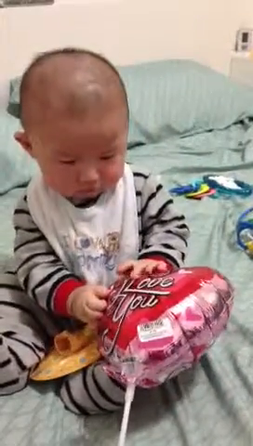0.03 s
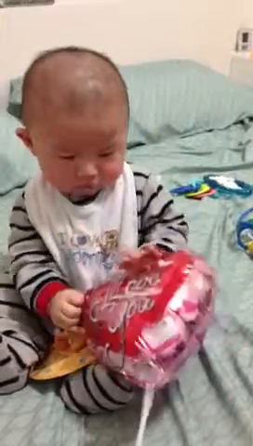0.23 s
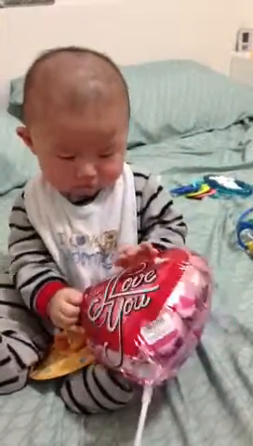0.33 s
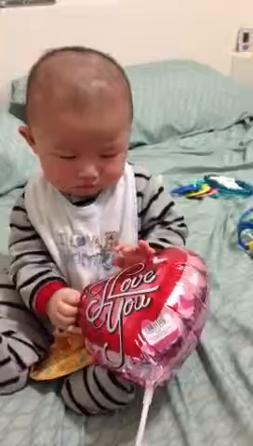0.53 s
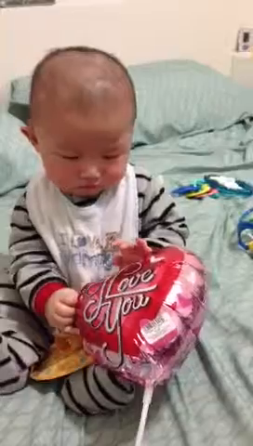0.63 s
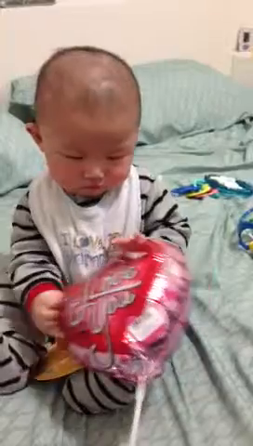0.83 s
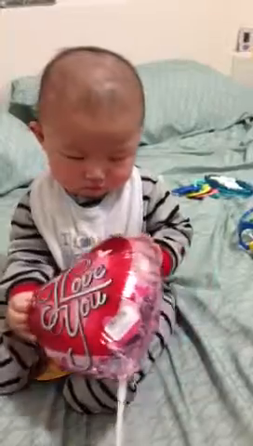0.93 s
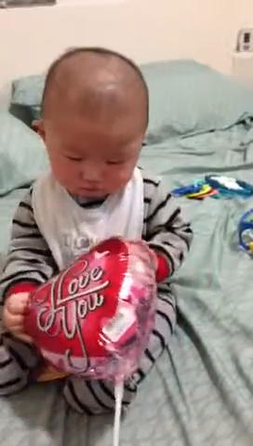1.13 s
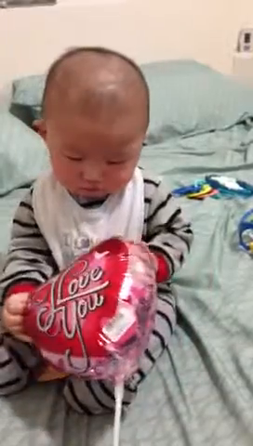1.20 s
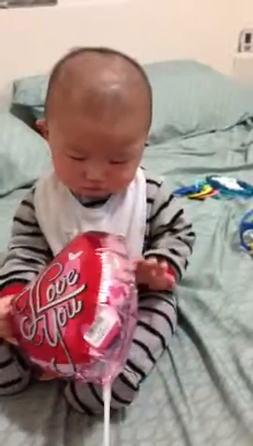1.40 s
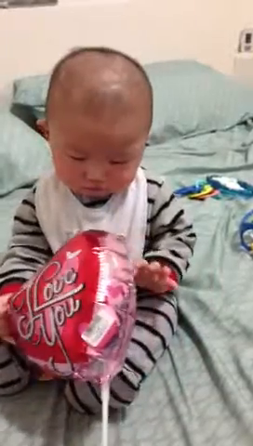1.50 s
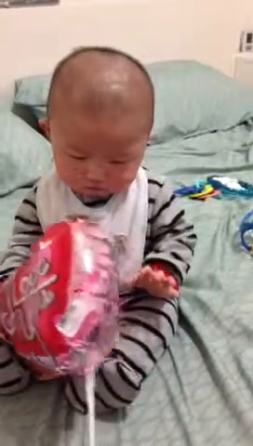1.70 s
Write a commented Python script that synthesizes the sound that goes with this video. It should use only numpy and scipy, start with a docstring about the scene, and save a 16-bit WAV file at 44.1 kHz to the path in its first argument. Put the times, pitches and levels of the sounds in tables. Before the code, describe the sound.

A foil balloon crinkles and thumps under light pats, with a brief finger squeak.

```python
"""A baby pats and turns an inflated foil balloon on a bed, close to the microphone.
Light taps build to a thump of the taut skin at 0.27 s, amid snapping creases and fine crinkling.
After a lull the foil crackles again from 0.75 s, and a finger squeaks across it in one broken stroke.
A sharp pat follows at 1.17 s, a softer one at 1.32 s, then a few last ticks.
Throughout, the gas inside rings faintly and a small bedroom answers, over a faint hiss."""
import sys
import numpy as np
from scipy import signal
from scipy.fft import rfft, irfft
from scipy.io import wavfile
from scipy.ndimage import uniform_filter1d

SR = 44100
rng = np.random.default_rng(int(sys.argv[2]) if len(sys.argv) > 2 else 0)


def transcribe(signal):
    """Save signal, clipped to [-1, 1], as a 16-bit WAV file at the path in sys.argv[1]."""
    frames = np.atleast_2d(signal).T
    limited = np.clip(frames, -1, 1)
    pcm = np.round(limited * 32767).astype(np.int16)
    wavfile.write(sys.argv[1], SR, pcm)


N = 77175


def undb(db):
    """Decibels to gain."""
    return 10 ** (np.asarray(db) / 20)


def unit(x):
    """Scale to energy 1."""
    return x / np.sqrt(np.sum(x ** 2) + 1e-20)


def unit_rms(x):
    """Scale to rms 1."""
    return unit(x) * np.sqrt(len(x))


def decay(t, t60_s):
    """Exponential fade, 60 dB down at t60_s."""
    return np.exp(-np.log(1000) * t / t60_s)


def band(x, lo_hz, hi_hz, order=2):
    """Causal band-pass."""
    sos = signal.butter(order, [lo_hz, min(hi_hz, .47 * SR)], "band", fs=SR, output="sos")
    return signal.sosfilt(sos, x)


def colour(x, curve):
    """Filter by a curve of f/Hz, gain/dB."""
    hz, db = np.array(curve).T
    bins_hz = np.maximum(np.arange(len(x) // 2 + 1) * SR / len(x), 1)
    gain = undb(np.interp(np.log(bins_hz), np.log(hz), db))
    return irfft(rfft(x) * gain, len(x))


# hiss spectrum: f/Hz, relative level/dB
HISS_SPECTRUM = [(30, -41), (90, -2.5), (170, 10.5), (400, 8.5), (1000, -1), (2000, -3.5), (3300, 4),
                 (6000, 1.5), (12000, 0), (15000, -4)]


def hiss(rms_db=-68):
    """Faint steady coloured noise."""
    return unit_rms(colour(rng.standard_normal(N), HISS_SPECTRUM)) * undb(rms_db)


# echo bands: low f/Hz, high f/Hz, gain/dB, t60/s
ROOM_BANDS = [(128.3, 472, -9.5, 0.13), (496, 1160, -8, 0.15), (956, 2000, -5.5, 0.2),
              (2037, 4600, -8.5, .25), (4350, 12000, -12.5, 0.1), (8100, 21000, -11, 0.14)]


def bedroom(x, delay_s=.0016, build_s=.0049, late_db=-24.5, late_t60_s=.65):
    """Short diffuse echo with a faint longer tail."""
    t = np.arange(SR * 3 // 4) / SR
    build = 1 - np.exp(-np.maximum(t - delay_s, 0) / build_s)
    echo = 0
    for lo_hz, hi_hz, db, t60_s in ROOM_BANDS:
        fade = decay(t, t60_s) + undb(late_db) * decay(t, late_t60_s)
        noise = band(rng.standard_normal(len(t)), lo_hz, hi_hz, order=3)
        band_share = 2 * (hi_hz - lo_hz) / SR
        echo += undb(db) * np.sqrt(band_share) * unit(noise * build * fade)
    return signal.fftconvolve(x, echo)[:N]


# skin and gas modes: f/Hz, impulse response level/dB, t60/s
CAVITY_MODES = [(741, -68, 0.2), (1230, -65.5, 0.2), (1363, -61.5, 0.27), (1566, -58.5, 0.25),
                (1748, -69, 0.35), (1850, -52.5, 0.11), (2530, -69.5, .16), (2580, -67.5, .16),
                (2870, -46.5, .016), (3760, -35, 0.0098)]


def cavity(x):
    """Skin and enclosed gas ring on in their modes."""
    t = np.arange(SR // 2) / SR
    ring = sum(undb(db) * decay(t, t60_s) * np.cos(2 * np.pi * hz * t) for hz, db, t60_s in CAVITY_MODES)
    return signal.fftconvolve(x, ring)[:N]


# crinkle envelope: t/s, rms level/dB
CRINKLE_ENVELOPE = [(0, -71), (.055, -65.5), (.12, -75.5), (.2, -52.5), (.255, -44.5), (.3, -36),
                    (.335, -49), (.39, -62), (.5, -66), (.71, -70.5), (.8, -50), (.9, -53), (.95, -45),
                    (1.005, -43), (1.04, -55), (1.14, -63), (1.38, -68.5), (1.48, -83.5)]
# foil tick spectrum: f/Hz, relative level/dB
FOIL_SPECTRUM = [(100, -4.5), (200, 8.5), (500, 6.5), (1100, -0.5), (1900, 4.5), (3000, 2.5), (5500, 4.5),
                 (9000, -7.5), (15000, -5.5)]


def crinkle(ticks_per_s=600, spread_db=3.8):
    """The hand works the foil: a shower of tiny, uneven ticks."""
    t = np.arange(N) / SR
    ticks = (rng.random(N) < ticks_per_s / SR) * rng.choice([-1, 1], N)
    sizes = undb(spread_db * np.minimum(rng.exponential(size=N), 4))
    envelope = undb(np.interp(t, *np.array(CRINKLE_ENVELOPE).T))
    return unit_rms(colour(ticks * sizes, FOIL_SPECTRUM)) * envelope


# chirps of one finger stroke: t/s, f/Hz, level/dB, rise/s, fall/s
SQUEAK_CHIRPS = [(0.8446, 1708, -41, .001, 0.0025), (.9170, 1700, -43.5, .001, 0.0052),
                 (0.964, 1925, -30, .0004, 0.0024), (0.9931, 707.8, -27.5, .003, 0.013)]
# harmonics 1-4: relative level/dB
SQUEAK_HARMONICS_DB = [0.5, -11.5, -17, -34]


def squeak(at_s, hz, level_db, rise_s, fall_s, jitter=.035):
    """A fingertip sticks and slips on the foil: one wavering chirp."""
    t = np.arange(N) / SR - at_s
    waver = unit_rms(uniform_filter1d(rng.standard_normal(N), size=120))
    phase = 2 * np.pi * np.cumsum(hz * (1 + jitter * waver)) / SR
    swell = 2 * np.exp(-np.logaddexp(-t / rise_s, t / fall_s))
    tone = sum(undb(db) * np.sin(k * phase) for k, db in enumerate(SQUEAK_HARMONICS_DB, 1))
    return undb(level_db) * swell * tone


def swing(t, settled_hz, rise_s, sweep):
    """A few cycles of the skin, peak near 1. Short waves cross it first, so the pitch falls."""
    glide_s = min(2 * rise_s, .0011)
    cycles = settled_hz * (t + sweep * glide_s * (1 - np.exp(-t / glide_s)))
    envelope = t / rise_s * np.exp(1 - t / rise_s)
    return -envelope * np.sin(2 * np.pi * cycles)


# crease snaps: t/s, then level/dB in the low, middle, high and top band
CREASE_SNAPS = [(0.0557, -57, -54, -63, -72), (0.0627, -73, -55, -51, -66), (0.0736, -67, -54, -51, -57),
                (0.1372, -52, -58, -65, -77), (0.1538, -77, -61, -58, -68), (0.1695, -43, -35, -44, -56),
                (0.2092, -39, -41, -40, -60), (0.22, -39, -38, -51, -60), (0.2336, -39, -34, -43, -53),
                (0.2474, -32, -31, -36, -42), (0.2592, -32, -28, -39, -50), (0.2637, -31, -39, -35, -49),
                (0.2725, -24, -23, -25, -38), (0.2863, -32, -33, -36, -42), (0.289, -37, -36, -42, -50),
                (0.2972, -41, -40, -42, -51), (0.3055, -46, -38, -41, -50), (0.3152, -43, -43, -44, -55),
                (0.3245, -50, -47, -46, -55), (0.3396, -44, -40, -43, -59), (0.345, -47, -38, -43, -48),
                (0.3574, -48, -45, -49, -59), (0.4363, -66, -53, -63, -71), (0.5518, -70, -63, -64, -70),
                (0.5667, -73, -58, -65, -69), (0.5777, -52, -46, -49, -60), (0.59, -71, -55, -68, -73),
                (0.7323, -64, -61, -62, -64), (0.7541, -38, -37, -40, -57), (0.8178, -46, -38, -43, -48),
                (0.8442, -66, -41, -44, -48), (0.8531, -57, -46, -42, -48), (0.8552, -65, -45, -43, -50),
                (0.8664, -60, -54, -57, -53), (0.8837, -48, -50, -63, -65), (0.9038, -59, -44, -52, -60),
                (0.9149, -48, -41, -47, -45), (0.9233, -62, -56, -52, -51), (0.9285, -61, -50, -50, -53),
                (0.9371, -51, -37, -38, -49), (0.9437, -57, -39, -42, -54), (0.9551, -48, -41, -41, -43),
                (0.9628, -37, -29, -45, -55), (0.9754, -49, -42, -39, -44), (0.978, -45, -45, -41, -50),
                (0.9834, -40, -33, -34, -38), (0.9986, -34, -43, -39, -43), (1.0276, -49, -54, -53, -60),
                (1.0647, -53, -53, -54, -60), (1.0792, -59, -48, -51, -54), (1.0946, -58, -52, -55, -63),
                (1.1694, -37, -43, -50, -53), (1.1732, -26, -27, -36, -40), (1.3198, -38, -44, -54, -62),
                (1.3802, -71, -48, -46, -57), (1.392, -74, -54, -53, -62), (1.5278, -64, -54, -63, -65),
                (1.5858, -74, -67, -60, -68)]
# those bands: crack settled f/Hz, rise/s; shiver low f/Hz, high f/Hz, relative level/dB, decay/s
CREASE_BANDS = [(686, 0.00037, 600, 2600, -2.5, .003), (1835, 0.00013, 1500, 3000, 5, .002),
                (4160, 0.00017, 3400, 7800, -1, .0013), (7860, 0.000066, 6300, 12000, -4, 0.0015)]


def snaps(pitch_spread=.13, shiver_rise_s=.0004, rms_window_s=.004):
    """Each crease flips with a crack of about 1 ms, then shivers briefly."""
    out, t = np.zeros(N), np.arange(SR // 30) / SR
    onset = 1 - np.exp(-t / shiver_rise_s)
    for at_s, *levels_db in CREASE_SNAPS:
        for db, (hz, rise_s, lo_hz, hi_hz, shiver_db, decay_s) in zip(levels_db, CREASE_BANDS):
            crack_hz = hz * np.exp(pitch_spread * rng.standard_normal())
            crack = unit(swing(t, crack_hz, rise_s, sweep=.7))
            burst = rng.standard_normal(len(t)) * onset * np.exp(-t / decay_s)
            shiver = undb(shiver_db) * unit(band(burst, lo_hz, hi_hz))
            add(out, at_s, unit(crack + shiver) * np.sqrt(rms_window_s * SR) * undb(db))
    return out


# pats and buckles of the skin: t/s, ring level/dB, settled f/Hz, rise/s, thud level/dB
SKIN_PATS = [(.0360, -43, 524, 0.00063, -42.5), (.0560, -42.5, 412, 0.001, -48),
             (.1372, -50.5, 520, 0.0014, -45), (.1700, -32.5, 415, .001, -34.5),
             (.2200, -30, 450, 0.00043, -29), (.2478, -24, 326, 0.0037, -21.5),
             (.2620, -16, 362, 0.00067, -19.5), (0.2727, -23, 260, 0.00055, -5.5),
             (0.286, -48, 380, .002, -23), (.3400, -59.5, 339, 0.0027, -43.5),
             (0.3445, -57, 297, 0.0007, -28), (.7544, -33.5, 502, 0.0016, -31),
             (.8848, -37.5, 756, 0.00041, -40.5), (.9148, -41, 480, 0.0019, -42),
             (.9626, -26, 322, 0.003, -25), (1.0110, -34.5, 432, 0.0021, -44),
             (1.1736, -14, 308.6, 0.00096, -38), (1.3200, -30, 530, 0.0028, -30),
             (1.3410, -50, 180, 0.0013, -45)]


def pats(sweep=1.716):
    """The taut skin rings under the hand; the whole balloon gives a low thud."""
    out, t = np.zeros(N), np.arange(SR // 16) / SR
    thud = swing(t, settled_hz=183.6, rise_s=.00092, sweep=sweep)
    for at_s, ring_db, hz, rise_s, thud_db in SKIN_PATS:
        ring = swing(t, hz, rise_s, sweep)
        add(out, at_s, undb(ring_db) * ring + undb(thud_db) * thud)
    return out


def add(out, at_s, x):
    """Mix x into out from at_s."""
    i = int(at_s * SR)
    out[i:i + len(x)] += x[:N - i]


def scene():
    """Balloon, room echo and hiss, in mono."""
    skin = snaps() + pats() + crinkle() + sum(squeak(*chirp) for chirp in SQUEAK_CHIRPS)
    balloon = skin + cavity(skin)
    return (hiss() + bedroom(balloon) + balloon)[None]


def record(dry, low_cut_hz=198, top_hz=15600):
    """The microphone thins the bass and cuts the top."""
    thin = signal.sosfilt(signal.butter(2, low_cut_hz, "high", fs=SR, output="sos"), dry)
    return signal.sosfilt(signal.ellip(8, .2, 70, top_hz, fs=SR, output="sos"), thin)


dry = scene()
out = record(dry)
transcribe(out)
```